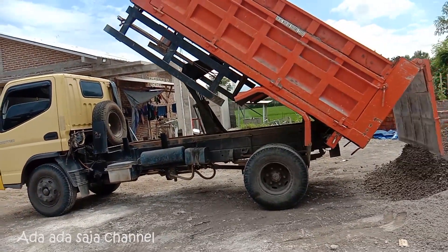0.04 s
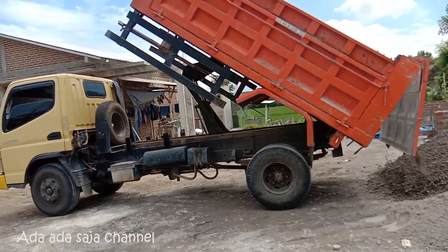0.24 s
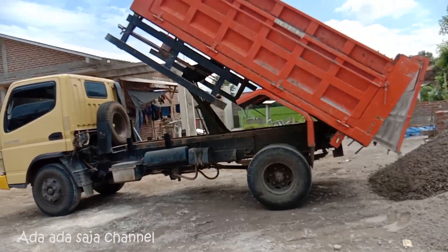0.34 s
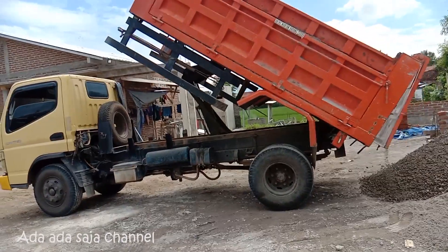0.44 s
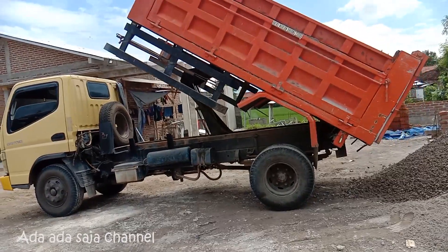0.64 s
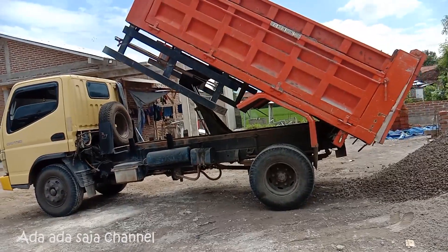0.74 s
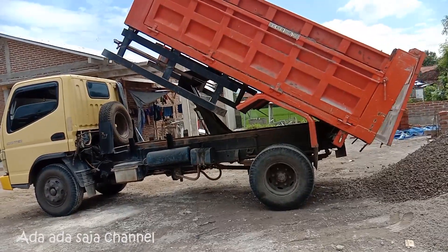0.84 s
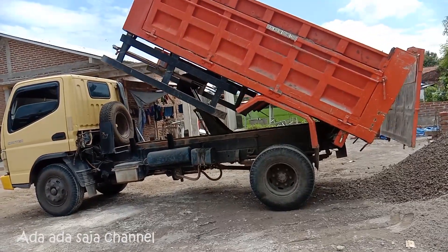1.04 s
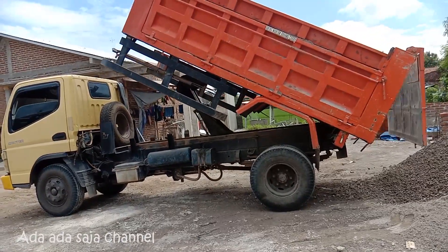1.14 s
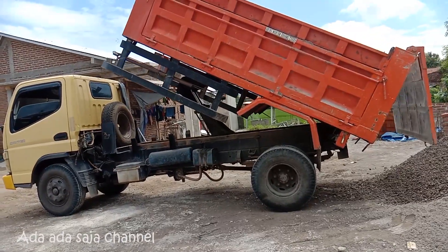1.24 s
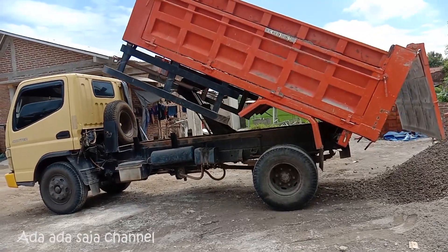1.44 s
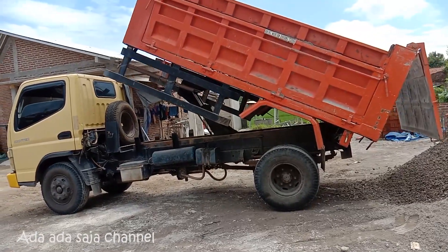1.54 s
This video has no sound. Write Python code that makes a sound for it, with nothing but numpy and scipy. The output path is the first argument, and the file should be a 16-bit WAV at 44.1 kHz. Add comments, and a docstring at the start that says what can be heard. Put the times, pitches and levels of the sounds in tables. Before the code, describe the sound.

A dump truck's steel tailgate bangs over a steadily knocking diesel idle in an open yard. Gravel hisses out from the start, and the gate thuds at about 0.2 seconds. Around 0.45 seconds it slams loudly and rattles, making the empty bed boom. A brief spill of gravel follows at 0.8 seconds. Near 1.1 seconds the gate clanks sharply again, its ring fading under the engine by 1.5 seconds.

```python
"""A diesel dump truck knocks at idle while the last gravel hisses off its raised steel bed onto a pile.
Each firing rings the engine block; the gravel is thousands of tiny stone contacts. The swinging
tailgate thuds against the gravel, slams and rattles on the bed, then swings back and clanks again.
The empty bed booms after every blow, and nearby house walls answer faintly."""
import sys
import numpy as np
from scipy import signal
from scipy.fft import rfft, irfft, next_fast_len
from scipy.io import wavfile
from scipy.ndimage import uniform_filter1d, minimum_filter1d, map_coordinates

SR = 44100
rng = np.random.default_rng(int(sys.argv[2]) if len(sys.argv) > 2 else 0)


def store_pcm(level_fs):
    """Save levels as 16-bit WAV."""
    pcm = np.round(np.clip(level_fs, -1, 1) * 32767).astype(np.int16)
    wavfile.write(sys.argv[1], SR, np.atleast_2d(pcm).T)


N = 70560

# Levels are relative: colours set only the tone, and envelopes and gains set the mix.
# injector tick, combustion and piston slap in one firing: t/s from ignition, knock/dB, clatter/dB
FIRING_IMPACTS = [(-.007, -36.5, -37.5), (0.0, -30.5, -30.5), (0.0086, -33, -40)]
# firing strength as the engine's load shifts: t/s, level/dB
ENGINE_LOAD = [(0, 1), (.85, .5), (1.0, 0), (1.35, 2.5), (1.52, -2)]
# harder knocks of the uneven idle: t/s, boost/dB
KNOCK_ACCENTS = [(.224, 5.5), (.75, 3), (.80, 5), (1.315, 0), (1.42, 1.5), (1.575, 5.5)]
# resonances of the engine block and its covers: f/Hz, width/Hz, level/dB
BLOCK_RESONANCES = [(1014, 73, -11), (1262.5, 53, 0), (1498, 84, -6.5), (2524, 70, -14.5),
                    (3460, 130, -26.5), (3588, 168, -1.5)]
# colours of the engine's clatter and steady churn: f/Hz, level/dB
CLATTER_COLOUR = [(300, -6.5), (700, -10.5), (1200, -7.5), (1900, -9), (2500, -3.5), (3100, 3), (3700, 0.5),
                  (4500, -26.5), (5400, -8.5), (6300, -31), (7200, -30.5), (8200, -42.5), (9800, -33.5),
                  (12000, -53), (15000, -50.5)]
CHURN_COLOUR = [(25, -13.5), (60, -4), (130, 1.5), (250, -1), (345, 6.5), (450, 0.5), (720, -12.5),
                (1250, 6.5), (1850, -7.5), (3400, -3.5), (4500, -31.5), (5400, -30), (7800, -49.5),
                (10000, -37), (15000, -55)]
# the engine hum swells and sinks: t/s, level/dB
HUM_SWELL = [(0, -54), (.18, -37.5), (.85, -47.5), (1.02, -37), (1.3, -50.5), (1.6, -43.5)]

# gravel running off the bed: t/s, level/dB
GRAVEL_FLOW = [(0, -36), (.12, -34.5), (.24, -33.5), (.31, -35.5), (.45, -37.5), (0.701, -66),
               (.785, -44.5), (.82, -35.5), (.86, -36.5), (0.941, -43.5), (1.1, -52.5), (1.6, -52)]
# colours of tumbling stones, fine grit on steel and small slipping stones: f/Hz, level/dB
STONE_COLOUR = [(500, -13.5), (1200, -8.5), (1900, -10), (2600, 7.5), (3400, 9.5), (4000, -1),
                (4500, -13.5), (5400, 6.5), (6300, -27), (7000, -14), (8200, -38), (9700, -23),
                (12000, -49.5), (15000, -43.5)]
GRIT_COLOUR = [(3000, -21), (5300, 3.5), (7000, -0.5), (8200, -13.5), (9700, 2), (11000, -14), (13000, -20),
               (15000, -17.5)]
SLIP_HISS_COLOUR = [(2000, -38), (3800, 5.5), (5600, -3), (8000, -19.5), (11000, -23), (15000, -36)]
# small stones tick and hiss off the bed: t/s, rise/s, t60/s, level/dB
STONE_SLIPS = [(.278, 0.0035, 0.04, -33.5), (0.362, .004, 0.042, -36.5), (0.793, 0.01, 0.081, -34)]

# tailgate blows: t/s, rise/s, bed boom/dB, plate clang/dB, jangle/dB, contact crack/dB, latch ping/dB
GATE_BLOWS = [(0.229, 0.016, -25, -24, -45, -31.5, -41), (0.244, 0.027, -12.5, -25, -41, -52, -75),
              (0.426, 0.0062, -11.5, -14, -22, -24, -31), (0.457, 0.0031, -25, -15, -18, -19.5, -29),
              (0.496, 0.02, -20, -20.5, -20, -24.5, -24.5), (1.0711, 0.005, -19.5, -25, -28, -13.5, -7.5),
              (1.096, 0.02, -15.5, -25.5, -27.5, -56.5, -41.5)]
# clear modes of the bed's panels and the gate's plate, latch and hook: f/Hz, level/dB, t60/s
BED_PANEL_MODES = [(77.4, -22.5, 2.1), (122, -17.5, 1.2), (143, -8, 0.74), (200.4, -9.5, 1.08),
                   (225, -12, 0.27), (243, -11.5, 0.35), (269, -8.5, .7), (297.2, -5, 0.95),
                   (369, -6, 0.47), (390, -15, 1.1)]
GATE_PLATE_MODES = [(440.8, 1, 0.51), (517.5, -4, 0.23), (548.4, -3.5, 0.29), (863, -9.5, 0.44),
                    (878, -3.5, 0.3), (993.6, -6, 0.82), (1046, -13, 0.42), (1270, 0, 0.68),
                    (1387, -9, 0.62), (2164, -19, 0.71), (2326, -15.5, 0.83), (2330, -17.5, 0.15),
                    (2853, -14, 0.76), (3480, -9.5, 0.12)]
GATE_LATCH_MODES = [(453.6, -9.5, 0.18), (1245, -0.5, 0.13), (1498, -14, 0.058), (1800, -10, .08),
                    (3300, -12.5, 0.047), (5270, -30, .35), (6680, -28.5, 0.044)]
GATE_HOOK_MODES = [(2335, 0, 0.095), (2500, -1, .12)]
# colours of the dense weak modes in bed, plate, fittings and contact: f/Hz, level/dB
BOOM_COLOUR = [(30, -42), (60, -24), (110, -1.5), (170, 2), (340, 4.5), (460, -0.5), (620, -12.5),
               (1000, -23), (2500, -94)]
CLANG_COLOUR = [(150, -24), (450, -9), (690, -4), (900, 6), (1300, 6), (1600, -16.5), (2200, -23),
                (4500, -61)]
JANGLE_COLOUR = [(700, -38), (1500, -8.5), (2400, -4.5), (3700, -6), (4500, -30), (5400, -16), (6300, -38),
                 (8000, -60), (15000, -70.5)]
CRACK_COLOUR = [(200, -22.5), (450, 0), (680, -8), (1100, 5.5), (2000, -1), (3600, 3), (4700, -15),
                (5600, -11.5), (7500, -45), (15000, -54)]
# the hook rings once in the rebound: t/s, rise/s, level/dB
HOOK_STRIKE = [(.467, 0.0169, -13.5)]

FIRST_FIRING_S, FIRING_HZ, FIRING_RISE_S = 0.0165, 19.245, 0.003
KNOCK_T60_S, CLATTER_T60_S = 0.084, 0.067
SCATTER_S, SCATTER_DB, COLOUR_SPREAD_DB = 0.001, 1.0, 2
CHURN_DB, HUM_HZ = -39.5, 341.7
STONES_PER_S, STONE_SPREAD_DB, SURGE_DB = 2000, 2.5, 2.5
GRIT_DB, GRIT_FADE_START_S, GRIT_T60_S = -52.5, 0.22, 0.45
BOOM_DB, BED_RING_DB, BED_SWELL_S = -3.5, -3.5, 0.006
CLANG_DB, PLATE_RING_DB, CHATTER_DB, WAVER_RAD = -1.5, -5.5, 2, 0.4
YARD_DB, YARD_T60_S = -16, 0.37
CEILING, LIMITER_S, TOP_HZ = 0.93, 0.006, 15600


def amp(db):
    """Decibels to gain."""
    return 10 ** (np.asarray(db) / 20)


def unit(x):
    """Scale to rms 1."""
    return x / np.sqrt(np.mean(x ** 2) + 1e-20)


def clock():
    """Seconds at each sample."""
    return np.arange(N) / SR


def fader(points):
    """A gain ride through points of t/s, level/dB."""
    return amp(np.interp(clock(), *np.transpose(points)))


def filtered(x, response):
    """Shape x with a gain that depends on frequency."""
    size = next_fast_len(N + SR // 2)
    return irfft(rfft(x, size) * response(np.fft.rfftfreq(size, 1 / SR)), size)[:N]


def coloured(x, colour):
    """Equalise x through points of f/Hz, level/dB, at rms 1."""
    f, db = np.transpose(colour)
    return unit(filtered(x, lambda hz: amp(np.interp(np.log(hz + 1), np.log(f), db))))


def noise(colour):
    """Fresh coloured noise."""
    return coloured(rng.standard_normal(N), colour)


def resonance(hz, width_hz):
    """Noise ringing in one resonance, at rms 1."""
    return unit(filtered(rng.standard_normal(N), lambda f: 1 / (1 + ((f - hz) / (0.95 * width_hz)) ** 2)))


def struck(start, rise, t60):
    """Envelope that climbs over the rise time, then dies away."""
    age = clock() - start
    return np.clip(age / rise, 0, 1) * amp(-60 * np.maximum(age - rise, 0) / t60)


def wobble(per_s):
    """A smooth random curve that changes per_s times a second."""
    return map_coordinates(rng.standard_normal(size=1024), [clock() * per_s], mode="mirror")


def engine():
    """Each firing's quick impacts clatter and ring the block in a fresh colour, over churn and hum."""
    knock_power, clatter_power = np.zeros((len(BLOCK_RESONANCES), N)), np.zeros(N)
    count = int(N / SR * FIRING_HZ) + 2
    scatters = rng.standard_normal((count, len(FIRING_IMPACTS), 3)) * (SCATTER_S, SCATTER_DB, SCATTER_DB)
    colours_db = COLOUR_SPREAD_DB * rng.standard_normal((count, len(BLOCK_RESONANCES), 1))
    for k, (scatter, colour_db) in enumerate(zip(scatters, colours_db), -1):
        ignition = FIRST_FIRING_S + k / FIRING_HZ
        accent_db = sum(boost for t, boost in KNOCK_ACCENTS if abs(t - ignition) < 0.5 / FIRING_HZ)
        drive_db = np.interp(ignition, *np.transpose(ENGINE_LOAD)) + accent_db
        for delay, knock_db, clatter_db in np.array(FIRING_IMPACTS) + scatter:
            start = ignition + delay
            knock = amp(drive_db + knock_db + colour_db) * struck(start, FIRING_RISE_S, KNOCK_T60_S)
            clatter = amp(drive_db + clatter_db) * struck(start, FIRING_RISE_S, CLATTER_T60_S)
            knock_power += knock ** 2
            clatter_power += clatter ** 2
    block = sum(amp(db) * np.sqrt(power) * resonance(hz, width)
                for (hz, width, db), power in zip(BLOCK_RESONANCES, knock_power))
    hum = fader(HUM_SWELL) * resonance(HUM_HZ, width_hz=32)
    clatter = np.sqrt(clatter_power) * noise(CLATTER_COLOUR)
    churn = amp(CHURN_DB) * noise(CHURN_COLOUR)
    return block + clatter + churn + hum


def gravel():
    """Stone contacts pour off the bed in surges; grit hisses until the tailgate closes on it."""
    count = int(STONES_PER_S * N / SR)
    when, size, polarity = rng.random((count, 3)).T
    stone_db = STONE_SPREAD_DB * np.minimum(-np.log(1 - size), 4)  # many soft, a few loud
    contacts = np.bincount((when * N).astype(int), amp(stone_db) * np.sign(polarity - 0.5), N)
    stones = coloured(contacts, STONE_COLOUR) * fader(GRAVEL_FLOW)
    grit_fade_db = 60 * np.maximum(clock() - GRIT_FADE_START_S, 0) / GRIT_T60_S
    grit = noise(GRIT_COLOUR) * amp(GRIT_DB - grit_fade_db)
    slip_envelope = sum(amp(db) * struck(t, rise, t60) for t, rise, t60, db in STONE_SLIPS)
    slips = slip_envelope * noise(SLIP_HISS_COLOUR)
    return (stones + grit) * amp(SURGE_DB * wobble(per_s=70)) + slips


def wash(colour, blows, t60):
    """Countless weak modes blur into noise that dies away after each blow (t/s, rise/s, level/dB)."""
    return sum(amp(level) * noise(colour) * struck(t, rise, t60) for t, rise, level in blows)


def ring(modes, blows):
    """Each blow (t/s, rise/s, level/dB) feeds the decaying modes, whose pitch wavers a little."""
    out = np.zeros(N)
    for hz, db, t60 in modes:
        energy = sum((amp(level) * struck(t, rise, t60)) ** 2 for t, rise, level in blows)
        phase = 2 * np.pi * (hz * clock() + rng.random()) + WAVER_RAD * wobble(per_s=16)
        out += amp(db) * np.sqrt(energy) * np.sin(phase)
    return out


def tailgate():
    """Each blow cracks at the contact, rings latch, plate and loose fittings, and spreads into the bed."""
    t, rise, boom_db, clang_db, jangle_db, crack_db, ping_db = np.transpose(GATE_BLOWS)
    on_bed = list(zip(t, rise + BED_SWELL_S, boom_db))
    on_plate = list(zip(t, rise, clang_db))
    bed = amp(BOOM_DB) * wash(BOOM_COLOUR, on_bed, t60=0.94)
    bed += amp(BED_RING_DB) * ring(BED_PANEL_MODES, on_bed)
    plate = amp(CLANG_DB) * wash(CLANG_COLOUR, on_plate, t60=0.57)
    plate += amp(PLATE_RING_DB) * ring(GATE_PLATE_MODES, on_plate)
    fittings = wash(JANGLE_COLOUR, zip(t, rise, jangle_db), t60=0.43)
    fittings *= amp(CHATTER_DB * wobble(per_s=220))
    hook = ring(GATE_HOOK_MODES, HOOK_STRIKE)
    crack = wash(CRACK_COLOUR, zip(t, rise, crack_db), t60=0.09)
    latch = ring(GATE_LATCH_MODES, list(zip(t, rise, ping_db)))
    return bed + plate + fittings + hook + crack + latch


def yard(x):
    """The ground and the house walls answer with a short tail."""
    tail = rng.standard_normal(N) * struck(start=0.006, rise=0.012, t60=YARD_T60_S)
    return signal.fftconvolve(x, tail / np.linalg.norm(tail))[:N]


def scene():
    """The truck in the open yard."""
    truck = tailgate() + engine() + gravel()
    return (truck + amp(YARD_DB) * yard(truck))[None]


def record(dry):
    """A fast limiter holds down the highest peaks; a steep low-pass trims the very top."""
    window = int(LIMITER_S * SR)
    needed_gain = CEILING / np.maximum(np.abs(dry[0]), CEILING)
    gain = uniform_filter1d(minimum_filter1d(needed_gain, 2 * window), window)
    return filtered(dry[0] * gain, lambda hz: hz < TOP_HZ)[None]


dry = scene()
out = record(dry)
store_pcm(out)
```